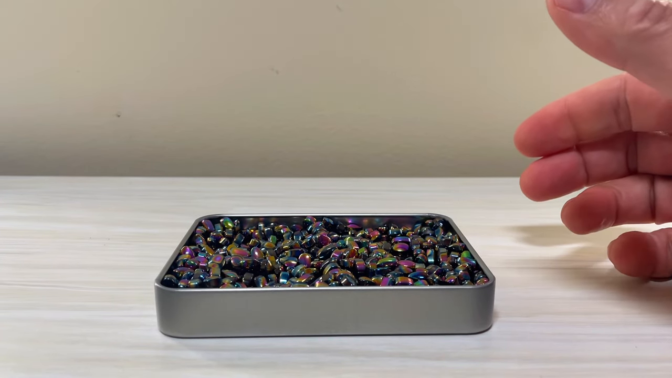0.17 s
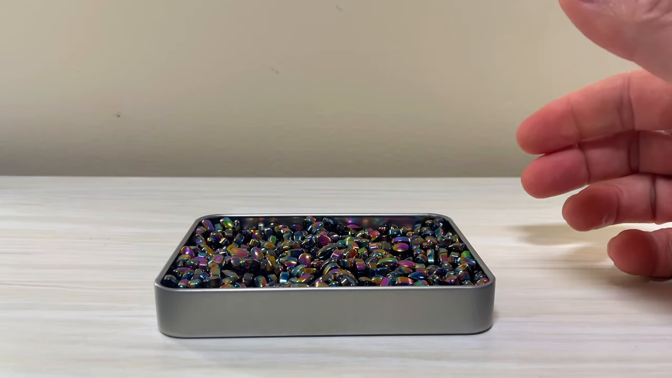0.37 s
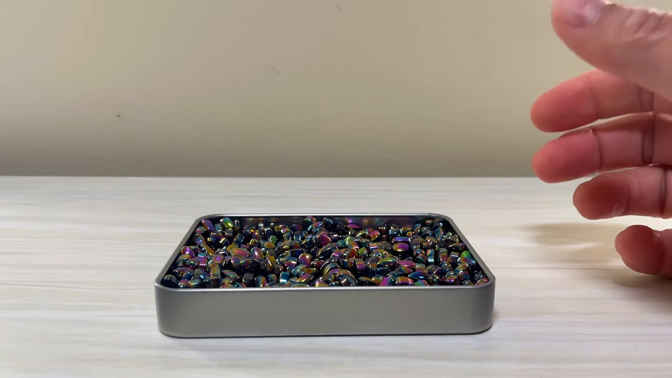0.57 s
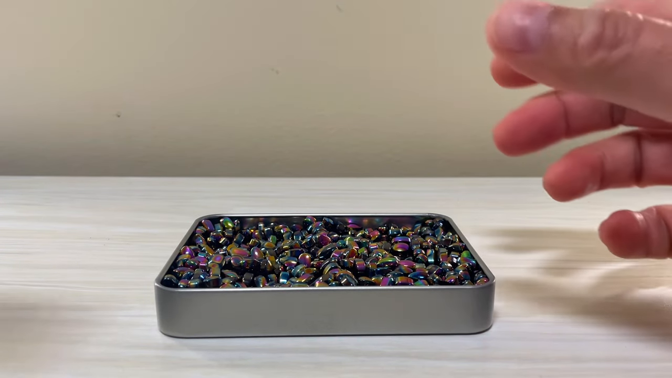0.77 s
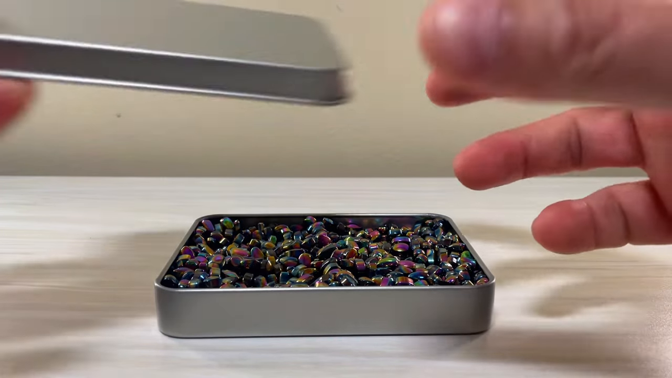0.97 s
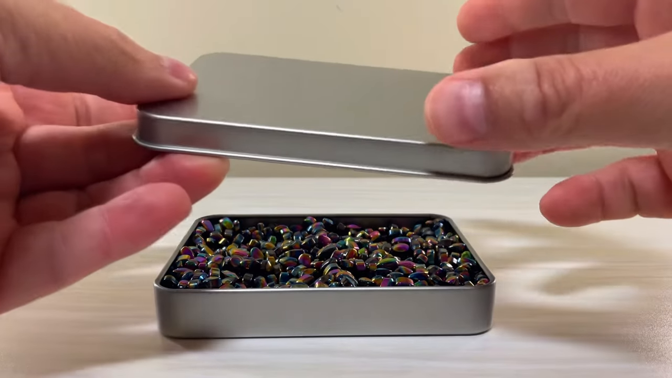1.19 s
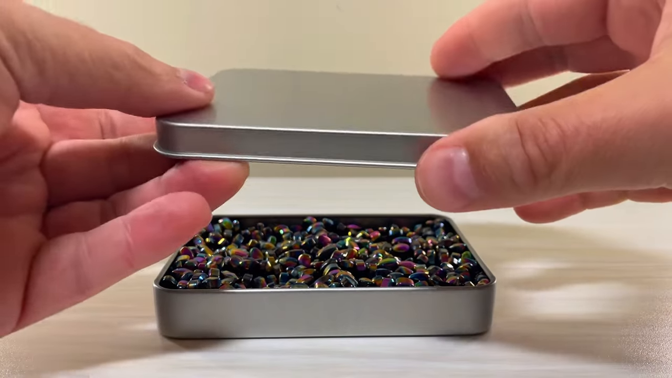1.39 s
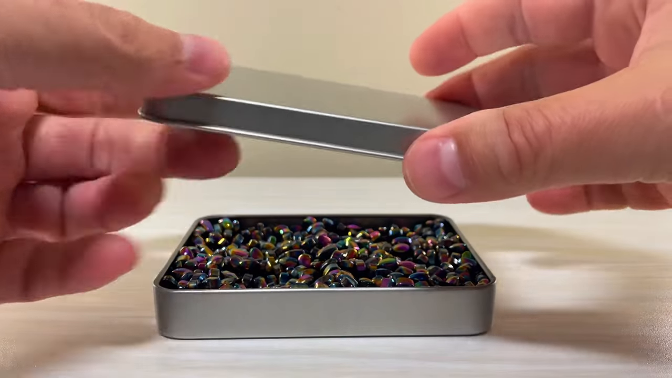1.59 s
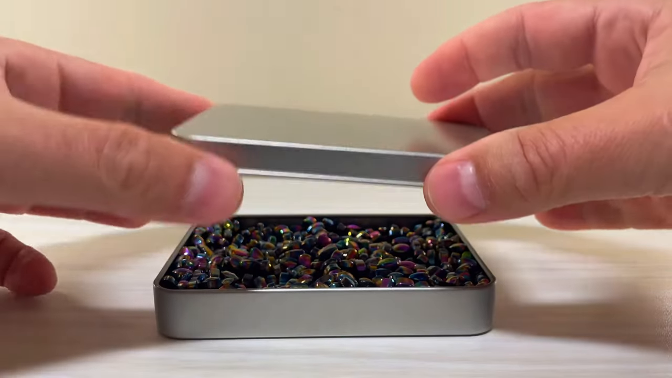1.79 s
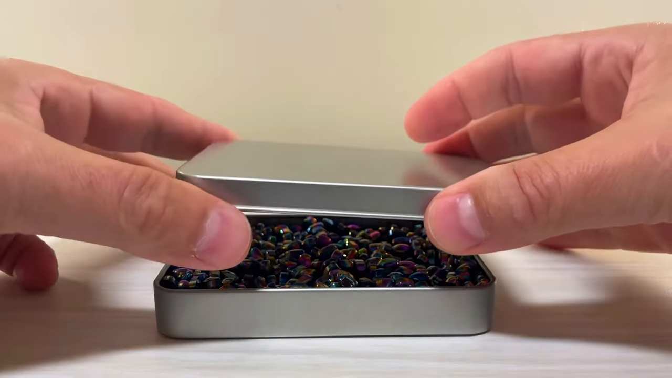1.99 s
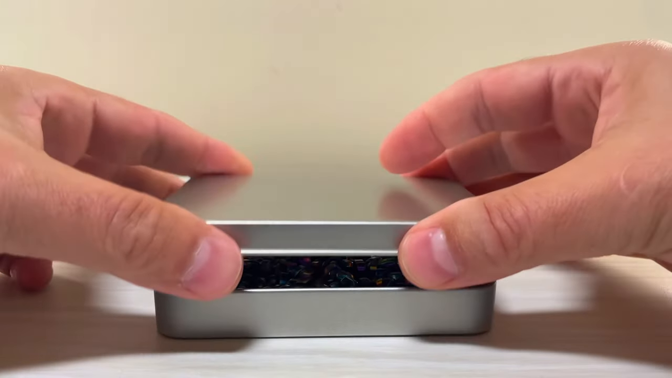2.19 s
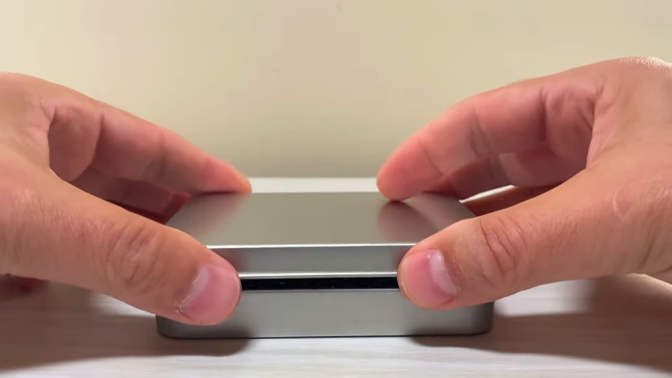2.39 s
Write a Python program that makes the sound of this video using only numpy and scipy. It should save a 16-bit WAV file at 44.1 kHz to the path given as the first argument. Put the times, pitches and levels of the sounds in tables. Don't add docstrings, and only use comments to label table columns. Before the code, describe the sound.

A thin metal lid clacks loudly onto a wooden table, then later clicks shut on its tin

```python
import sys
import numpy as np
from scipy import signal
from scipy.fft import rfft, irfft, next_fast_len
from scipy.io import wavfile
from scipy.ndimage import map_coordinates

SR = 44100
rng = np.random.default_rng(int(sys.argv[2]) if len(sys.argv) > 2 else 0)


def boost(x):
    u = np.asarray(x, float) / 20
    return 10 ** u


def log_audio(samples):
    frames = np.atleast_2d(samples).T
    limited = np.clip(frames, -1, 1)
    pcm = np.round(limited * 32767).astype(np.int16)
    wavfile.write(sys.argv[1], SR, pcm)


N = 110250

# start_s, peak_db
RIM_TICK_EVENTS = [
    (.0971, -39),
]
KNOCK_EVENTS = [
    (.2363, -6.5),
]
ROCK_EVENTS = [
    (.2445, -18),
    (.2505, -17),
    (.2745, -26.5),
]
TICK_EVENTS = [
    (.5422, -55),
    (.8215, -55),
    (1.19, -59.5),
    (1.345, -62),
    (1.4, -61.5),
]
TAP_EVENTS = [
    (.6175, -46),
]
CLICK_EVENTS = [
    (2.412, -19),
]
SETTLE_EVENTS = [
    (2.4245, -36),
    (2.4335, -39),
    (2.448, -44),
    (2.473, -48),
    (2.49, -47.5),
]

# pitch_hz, level_db, t60_s
RIM_MODES = [(3640, 6, 0.23), (3320, 1.9, .07)]
LID_MODES = [(159.5, -26, 0.6), (374, -17, 0.51), (417, -19.5, 0.6), (540, -17, 0.2), (653, -19.5, .2),
             (850, -15, 0.087), (1080.4, -10.5, 0.24), (1570, -13, 0.15), (1824, 0.5, 0.07),
             (1921, -10.5, 0.16), (2250, -7, .1), (2462, 1, 0.045), (2580, -3, .09), (2940, -13.5, 0.15)]
EDGE_MODES = [(3117, -8, 0.069), (3290, -3, 0.07), (3365, -4.5, 0.045), (4070, -12.5, 0.16),
              (4320, -7, 0.17), (4463, -10, 0.12), (4830, -9, 0.087), (5030, -14, 0.19), (5250, -14.5, .15),
              (5560, -14.5, 0.073), (6230, -18, .1)]
TABLE_MODES = [(112.7, 1.5, 0.23), (164, -5, 0.18), (210, -19.5, 0.6), (540, -16, 0.52), (1260, -28, 0.11),
               (2080, -14, 0.13), (2260, -1.5, 0.024), (2540, -12.5, 0.19)]
TIN_MODES = [(114, -10, 0.092), (334, -24, 0.064), (588, -16.5, 0.024), (545.4, -29.5, 0.17),
             (1104, -1.5, 0.05), (1288, 0, 0.008), (1440, 5.5, 0.021), (1540, -22, 0.11),
             (2180, -5.5, 0.035), (2584, -18.5, 0.074), (3280, -18, 0.042), (3900, -13.5, 0.013)]
# pitch_hz, level_db, t60_s
SEAT_MODES = [(566, -1, 0.046), (1050, -8.5, 0.046), (1248, -0.5, 0.038), (1544, 0, 0.095),
              (2166, -8, 0.038)]
# pitch_hz, level_db
FLEX_MODES = [(369, -1.5), (413, -1.5)]
SCRAPE_HZ = [335, 515, 1620, 2050, 2280, 2900, 3240, 4550]

# pitch_hz, density_db_per_hz
SLIDE_COLOUR = [(150, -17), (320, -6.5), (690, -8), (3200, -7.5), (6900, -20.5), (9000, -28.5),
                (13200, -33), (16000, -61)]
KNOCK_COLOUR = [(100, -18.5), (365, -9), (1500, -9.5), (2600, -5), (5000, -6.5), (8800, -11.5),
                (13000, -19.5), (16000, -35.5)]
TICK_COLOUR = [(300, -22.5), (800, -3.5), (3000, -3.5), (7000, -5.5), (14000, -14), (16500, -43)]
TAP_COLOUR = [(100, -3.5), (500, 1.5), (900, -19), (1300, -8), (1700, -23), (2050, -1), (2700, -2.5),
              (3100, -58)]
CLICK_COLOUR = [(100, -10), (370, -6.5), (1100, 5.5), (1500, -3.5), (1830, -16), (2300, -5), (5000, -17),
                (16000, -26)]
SPIKE_COLOUR = [(800, -33), (2500, -6), (6000, 1.5), (9000, -1.5), (14000, -7.5), (16000, -12.5),
                (16900, -51)]
CLOTH_COLOUR = [(500, -29.5), (900, -10.5), (2360, 0.5), (6500, -6), (9000, -11), (14000, -28),
                (16000, -50)]
SKIN_COLOUR = [(4500, -36.5), (7000, -5), (8500, -1), (10500, -4), (13000, -6.5), (16000, -17)]
PALM_COLOUR = [(150, -20), (300, -1), (550, 0), (720, -9), (1000, -30)]
RUMBLE_COLOUR = [(25, -13.5), (55, -2), (90, -4), (150, -21.5), (350, -24), (700, -34.5), (1200, -38.5),
                 (3000, -48.5)]

# pitch_hz, t60_s
ROOM_DECAY = [(100, 0.73), (400, 0.55), (2000, 0.47), (5000, 0.41), (9000, 0.31), (14000, 0.32)]
CONTACT_DECAY = [(100, 0.16), (1000, 0.14), (3000, 0.15), (8000, 0.041), (16000, .04)]

# time_s, level_db
SLIDE_LEVEL = [(0, -44.5), (.08, -45.5), (.12, -51), (.17, -62), (.212, -79), (.224, -53.5), (.236, -39),
               (.24, -100)]
SLEEVE_LEVEL = [(.45, -85.5), (.56, -74.5), (.72, -69), (.88, -75.5), (1.0, -74), (1.1, -80), (1.2, -77),
                (1.47, -80), (1.53, -69.5), (1.9, -67.5), (2.03, -81), (2.3, -88.5), (2.4, -82), (2.5, -84)]
FINGER_LEVEL = [(.5, -100), (.57, -85), (.7, -86), (.74, -75.5), (.9, -73.5), (.94, -89), (1.0, -75),
                (1.05, -105), (1.17, -105), (1.2, -79.5), (1.48, -76), (1.54, -66), (1.68, -76),
                (1.93, -81), (2.0, -100), (2.1, -87), (2.15, -70.5), (2.21, -100)]
PALM_LEVEL = [(.55, -95), (.65, -72.5), (.85, -78), (.95, -70.5), (1.15, -90), (1.24, -70), (1.44, -68),
              (1.5, -79.5), (1.85, -70), (2.05, -82.5), (2.35, -89.5), (2.45, -64)]
AIR_LEVEL = [(0, -64), (.5, -74.5), (.65, -71.5), (.88, -70.5), (1.0, -70), (1.15, -70.5), (1.35, -69),
             (1.9, -67), (2.3, -78.5)]
HUM_LEVEL = [(.5, -72.5), (.65, -74), (.9, -75.5), (1.3, -58.5), (1.5, -70.5), (1.68, -53.5), (2.05, -55),
             (2.3, -65), (2.5, -54)]
# time_s, db_under_top
WHINE_LEVEL = [(.5, -19.5), (1.0, -0.5), (1.6, 0), (1.95, -2), (2.05, -21), (2.22, -6.5), (2.3, -15)]

# pitch_hz, correlation
LIKENESS = [(40, 0.93), (200, 0.9), (600, -0.17), (2000, 0.42), (6000, 0.31), (8500, -.2), (12000, 1)]
# pitch_hz, gain_db
PORT_SUM = [(6800, 2), (7700, -5.5), (8100, -40.5), (8900, -39.5), (9300, 3), (13000, -1), (14000, -39.5)]
PORT_DIFFERENCE = [(9000, 2), (10200, -6.5), (11000, -31.5), (11800, -21), (13000, 8.5), (16000, 4.5),
                   (16900, -61.5)]
# pitch_hz, lean_db
KNOCK_LEAN = [(150, 1.5), (400, 0), (700, -1), (1300, 1.5), (2500, 1.5), (5000, 0.5)]
CLICK_LEAN = [(150, 0.26), (1100, 0.26), (2200, .3)]

SCRAPE_WIDTH_HZ = 56
HUM_HZ, WHINE_HZ, WHINE_DB = 113, 1599.6, -79
RISE_CYCLES, ROUGH_RAD = 1, 0.68
SPIKE_T60_S = .0045
GATE_S, GATE_DB_PER_S = 0.23, 203
FLEX_DB, FLEX_RISE_S, FLEX_T60_S = -20.5, 0.0061, 0.21
SEATED_S, SEATED_T60_S = 0.046, 0.045
LEFT_DB = 0.81


def unit(x):
    return x / np.sqrt(np.mean(x ** 2) + 1e-20)


def along(points, hz):
    point_hz, value = np.transpose(points)
    return np.interp(np.log(hz + 1), np.log(np.abs(point_hz) + 1), value)


def curve(rows):
    time_s, level_db = np.transpose(rows)
    return boost(np.interp(np.arange(N) / SR, time_s, level_db))


def wobble(rate_hz, size=N):
    knots = rng.standard_normal(int(size * rate_hz / SR) + 4)
    return map_coordinates(knots, [np.arange(size) * rate_hz / SR])


def filtered(x, response):
    size = x.shape[-1]
    padded = next_fast_len(size + 8192)
    spectrum = rfft(x, padded) * response(np.fft.rfftfreq(padded, 1 / SR))
    return irfft(spectrum, padded)[..., :size]


def rush(colour, size, grain_db=0, ports=True):
    pair = rng.standard_normal((2, size))
    grain = rng.standard_normal(size // 32 + 1).repeat(32)[:size]

    def response(hz):
        port_db = np.array([along(PORT_SUM, hz), along(PORT_DIFFERENCE, hz)])
        turn = np.arccos(np.clip(along(LIKENESS, hz), -1, 1)) / 2
        return boost(along(colour, hz) + ports * port_db) * [np.cos(turn), np.sin(turn)]

    mid, side = filtered(pair * boost(grain_db * grain), response)
    return unit(np.array([mid + side, mid - side]))


def dying(colour, t60s, t, stretch):
    noise = rush(colour, size=len(t))
    edges_hz = np.geomspace(80, 16000, 9)

    def hats(hz):
        return np.array([along(np.c_[edges_hz, row], hz) for row in np.eye(len(edges_hz))])[:, None]

    t60_s = stretch * along(t60s, edges_hz)
    return (filtered(noise[None], hats) * boost(-60 * t / t60_s[:, None, None])).sum(0)


def hit(events, modes, colour, ring_db, crack_db, spike_db, room_db, crack_len, room_len, lag_s, lean, vary_db):
    out = np.zeros((2, N + SR))
    t = np.arange(SR // 3) / SR
    side = np.array([[1], [-1]])
    gate = boost(-GATE_DB_PER_S * np.maximum(t - GATE_S, 0))
    for start_s, peak_db in events:
        ring = 0
        for hz, level_db, t60_s in modes:
            mode_db = level_db + vary_db * rng.standard_normal() + side * along(lean, hz)
            rough = ROUGH_RAD * np.sqrt(hz / 1000) * wobble(90, size=len(t))
            tone = np.sin(2 * np.pi * hz * (t + side * lag_s / 2) + rough)
            ring = ring + boost(mode_db - 60 * t / t60_s) * (1 - np.exp(-t * hz / RISE_CYCLES)) * tone
        crack = boost(crack_db) * dying(colour, CONTACT_DECAY, t, crack_len) * (1 - np.exp(-t / 0.00063))
        spike = rush(SPIKE_COLOUR, size=len(t), ports=False) * (1 - np.exp(-t / 0.00018))
        spike = spike * boost(spike_db - 60 * t / SPIKE_T60_S)
        room = boost(room_db) * dying(colour, ROOM_DECAY, t, room_len) * (1 - np.exp(-t / 0.019))
        contact = (crack + spike) * boost(side * along(lean, 2300))
        blow = boost(peak_db) * (boost(ring_db) * ring + contact + room) * gate
        out[:, round(start_s * SR):][:, :len(t)] += blow
    return out[:, :N]


def slide():
    def plate(hz):
        loss = 1j * hz * SCRAPE_WIDTH_HZ
        return 0.21 + sum(loss / (centre * centre - hz * hz + loss) for centre in SCRAPE_HZ)

    scrape = unit(filtered(rush(SLIDE_COLOUR, size=N, grain_db=1.5), plate))
    return scrape * curve(SLIDE_LEVEL) * boost(1.5 * wobble(56))


def room_tone():
    t = np.arange(N) / SR
    low = rush(RUMBLE_COLOUR[:3] + [(130, -44.5), (300, -92)], size=N)
    low = low * boost(-64.5 + 0.92 * wobble(6.0))
    air = rush([(90, -38.5)] + RUMBLE_COLOUR[3:] + [(8000, -92.5)], size=N)
    air = air * curve(AIR_LEVEL) * boost(1.5 * wobble(26))
    hum = np.sin(2 * np.pi * HUM_HZ * t + 2.2 * wobble(9.2))
    hum = hum * curve(HUM_LEVEL) * boost(2.9 * wobble(36))
    whine_band = [(WHINE_HZ - 90, -40), (WHINE_HZ - 45, -3), (WHINE_HZ + 40, 0), (WHINE_HZ + 90, -40)]
    whine = rush(whine_band, size=N) * curve(WHINE_LEVEL) * boost(WHINE_DB + 4 * wobble(22))
    return low + air + hum + whine


def hands():
    sleeves = rush(CLOTH_COLOUR, size=N, grain_db=1.0) * curve(SLEEVE_LEVEL) * boost(1.5 * wobble(20))
    fingers = rush(SKIN_COLOUR, size=N, grain_db=1.5) * curve(FINGER_LEVEL) * boost(1.8 * wobble(64))
    palms = rush(PALM_COLOUR, size=N, grain_db=1.5) * curve(PALM_LEVEL) * boost(2.5 * wobble(40))
    return sleeves + fingers + palms


def rim_tick():
    return hit(RIM_TICK_EVENTS, RIM_MODES, TICK_COLOUR, ring_db=-11.0, crack_db=-10.5, spike_db=-15,
               room_db=-23.5, crack_len=0.88, room_len=.5, lag_s=.0001, lean=CLICK_LEAN, vary_db=0.5)


def knock():
    return hit(KNOCK_EVENTS, LID_MODES + EDGE_MODES, KNOCK_COLOUR, ring_db=-9, crack_db=-7.5, spike_db=-7.0,
               room_db=-17.0, crack_len=0.64, room_len=0.7, lag_s=.0004, lean=KNOCK_LEAN, vary_db=0)


def flex():
    t = np.maximum(np.arange(N) / SR - KNOCK_EVENTS[0][0], 0)
    pair = sum(boost(level_db) * np.sin(2 * np.pi * hz * t) for hz, level_db in FLEX_MODES)
    fade_db = -60 * t / FLEX_T60_S - 60 * np.maximum(t - SEATED_S, 0) / SEATED_T60_S
    return pair * boost(FLEX_DB + fade_db) * (1 - np.exp(-(t / FLEX_RISE_S) ** 2))


def rocks():
    return hit(ROCK_EVENTS, EDGE_MODES, TICK_COLOUR, ring_db=-10.5, crack_db=-6, spike_db=-59,
               room_db=-24.5, crack_len=0.22, room_len=0.48, lag_s=.0004, lean=KNOCK_LEAN, vary_db=3.0)


def ticks():
    return hit(TICK_EVENTS, [], TICK_COLOUR, ring_db=0, crack_db=0, spike_db=-4,
               room_db=-13.5, crack_len=0.25, room_len=0.28, lag_s=0, lean=CLICK_LEAN, vary_db=0)


def pick_up_tap():
    return hit(TAP_EVENTS, TABLE_MODES, TAP_COLOUR, ring_db=-0.5, crack_db=2, spike_db=-40,
               room_db=-4.5, crack_len=0.24, room_len=0.39, lag_s=.00003, lean=CLICK_LEAN, vary_db=1)


def closing_click():
    return hit(CLICK_EVENTS, TIN_MODES, CLICK_COLOUR, ring_db=-7, crack_db=-17, spike_db=-11.0,
               room_db=-30.5, crack_len=0.6, room_len=1.33, lag_s=0.000082, lean=CLICK_LEAN, vary_db=1)


def settling():
    return hit(SETTLE_EVENTS, SEAT_MODES, CLICK_COLOUR, ring_db=-2.5, crack_db=-13, spike_db=-60,
               room_db=-25, crack_len=0.28, room_len=.4, lag_s=0.000082, lean=CLICK_LEAN, vary_db=2.5)


def scene():
    on_table = knock() + rocks() + pick_up_tap()
    on_tin = closing_click() + settling()
    small = ticks() + rim_tick()
    return on_table + on_tin + small + flex() + slide() + hands() + room_tone()


def band_limit(x):
    return signal.sosfilt(signal.butter(12, 16880, fs=SR, output="sos"), x)


def record(dry):
    port_db = np.array([[LEFT_DB], [-LEFT_DB]])
    return band_limit(dry * boost(port_db))


dry = scene()
out = record(dry)
log_audio(out)
```